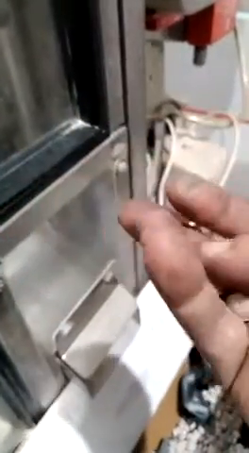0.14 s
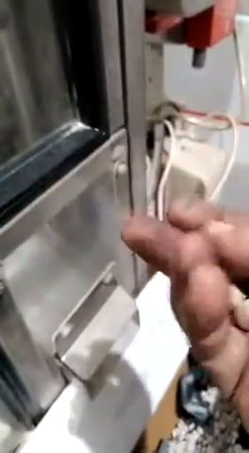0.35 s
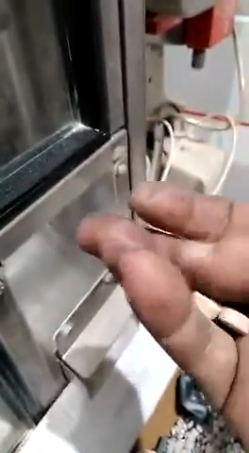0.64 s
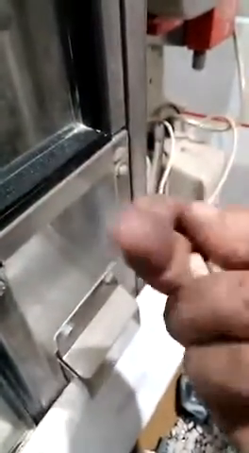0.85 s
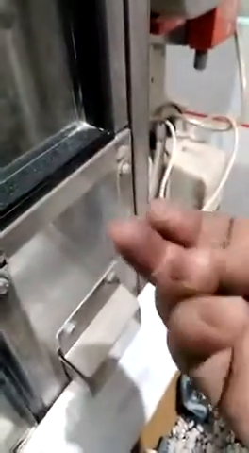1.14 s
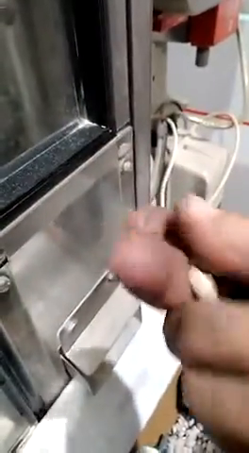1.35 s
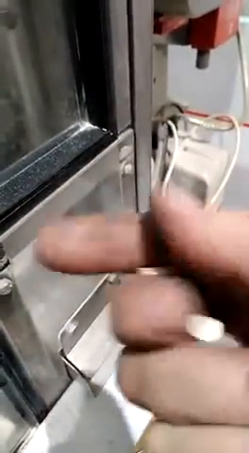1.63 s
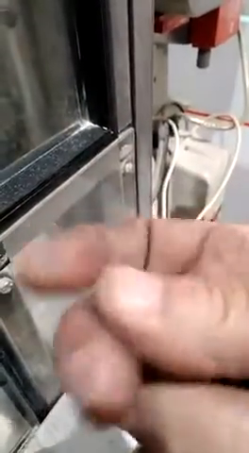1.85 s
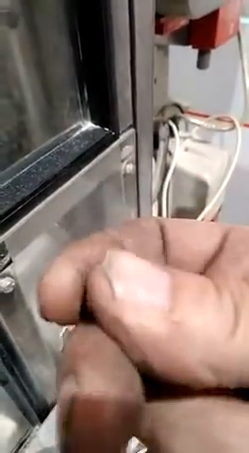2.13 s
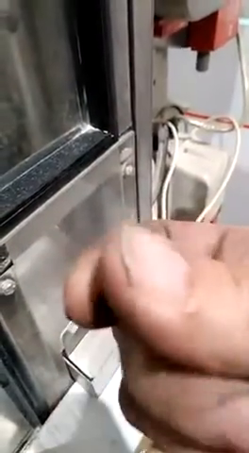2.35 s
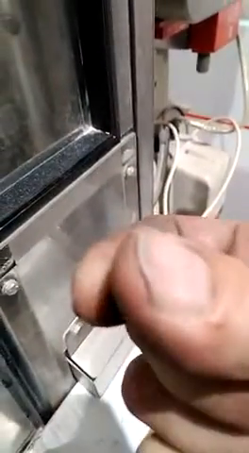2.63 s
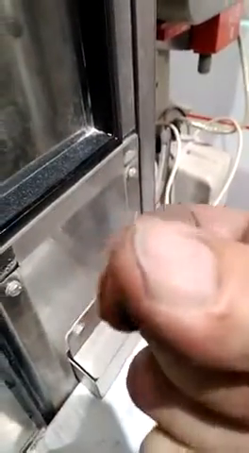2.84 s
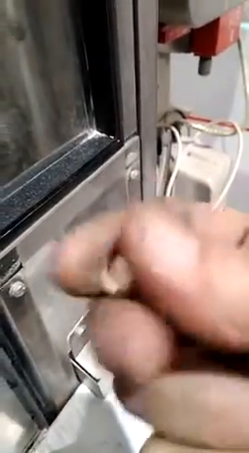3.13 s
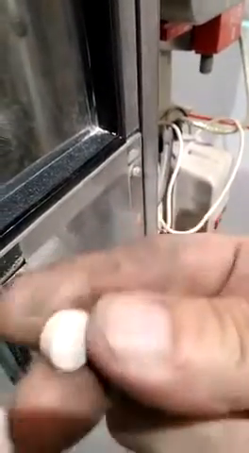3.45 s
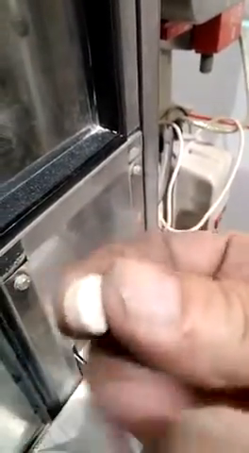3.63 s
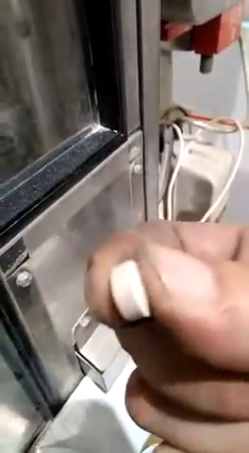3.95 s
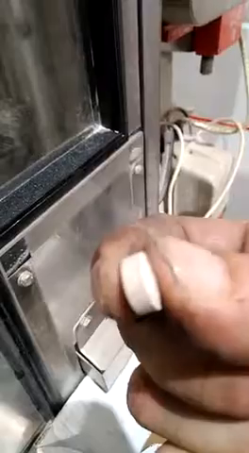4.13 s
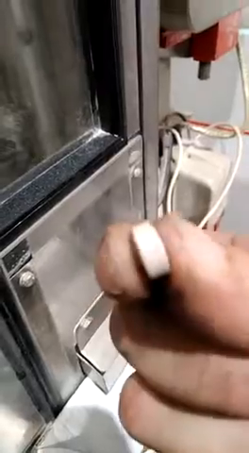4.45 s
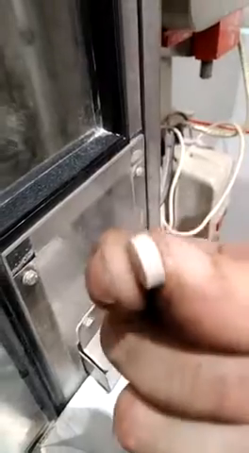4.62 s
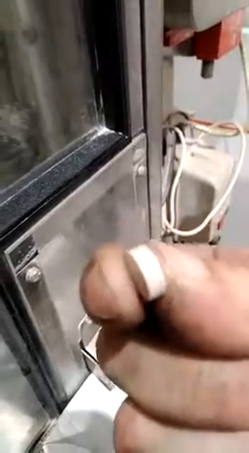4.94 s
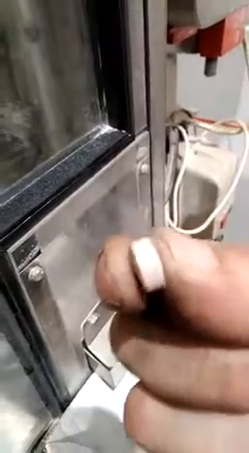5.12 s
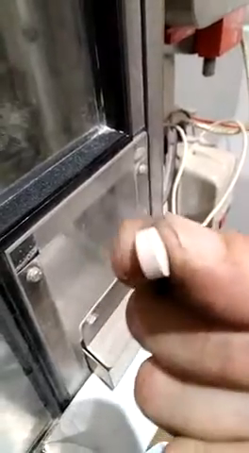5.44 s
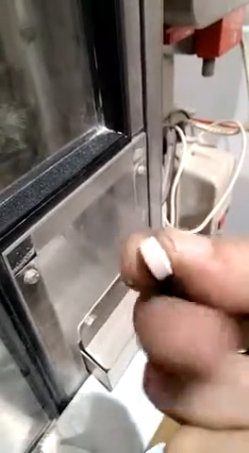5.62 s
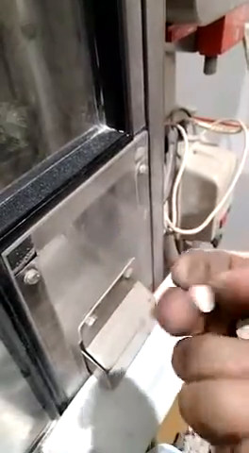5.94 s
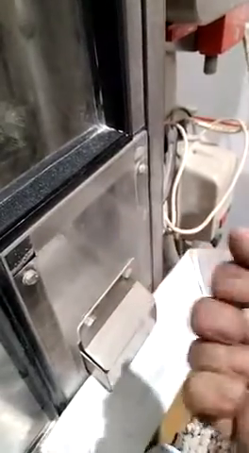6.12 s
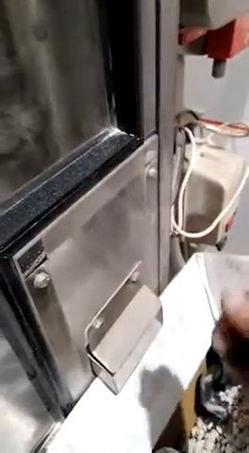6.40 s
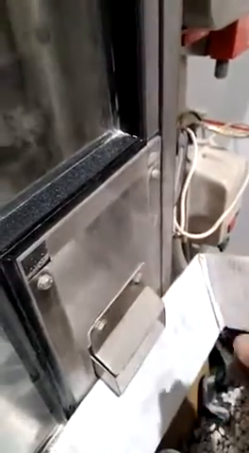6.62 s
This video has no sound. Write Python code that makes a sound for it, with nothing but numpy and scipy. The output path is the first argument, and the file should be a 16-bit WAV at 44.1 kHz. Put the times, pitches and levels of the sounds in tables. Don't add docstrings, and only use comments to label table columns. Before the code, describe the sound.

Steady cyclic clatter of a small steel machine: lighter clicks, then three heavy clanks each turn, rattling sheet metal over a low hum and sliding hiss.

```python
import sys
import numpy as np
from scipy import signal
from scipy.fft import rfft, irfft, next_fast_len
from scipy.io import wavfile
from scipy.ndimage import uniform_filter1d, minimum_filter1d, map_coordinates

SR = 44100
rng = np.random.default_rng(int(sys.argv[2]) if len(sys.argv) > 2 else 0)


def ratio_of_db(decibels):
    return 10 ** (np.asarray(decibels, float) / 20)


def master(y):
    cut = np.clip(np.atleast_2d(y).T, -1, 1)
    pcm = np.round(cut * 32767)
    wavfile.write(sys.argv[1], SR, pcm.astype(np.int16))


N = 298557
TURN = .8754


def unit(x):
    return x / np.sqrt(np.mean(x ** 2) + 1e-20)


def along(points, hz):
    f, v = np.transpose(points)
    return np.interp(np.log(hz + 1), np.log(f + 1), v)


def wobble(rate):
    knots = rng.standard_normal(int(N * rate / SR) + 4)
    return map_coordinates(knots, [np.arange(N) * rate / SR])


def filtered(x, response):
    m = next_fast_len(N + 8192)
    return irfft(rfft(x, m) * response(np.fft.rfftfreq(m, 1 / SR)), m)[..., :N]


# f/Hz, likeness (-1 opposed, 0 unrelated, 1 the same)
LIKENESS = [(60, -0.71), (99, -0.84), (160, -0.99), (270, -0.93), (450, -0.5), (740, 0.24), (1220, 0.23),
            (2010, 0.04), (3330, 0.02), (5500, -0.01), (9080, 0.0), (15000, 0.07)]
# f/Hz, level/dB
LEFT_LOUDER = [(60, 5.0), (110, 2.5), (200, 2.0), (380, 4.0), (700, 7.0), (1290, 5.0), (2380, 5.5),
               (4400, 7.0), (8120, 13.5), (15000, 1.0)]


def ports(pair, colour):
    def mix(hz):
        like = np.clip(along(LIKENESS, hz), -.995, .995)
        half_db = along(LEFT_LOUDER, hz) / 2
        to_left = ratio_of_db(half_db)
        to_right = ratio_of_db(-half_db) * like
        right_only = ratio_of_db(-half_db) * np.sqrt(1 - like ** 2)
        return ratio_of_db(along(colour, hz)) * [to_left, to_right, right_only]

    left, shared, own = filtered(pair[[0, 0, 1]], mix)
    return np.array([left, shared + own])


def rush(colour, patchy_db=0.5):
    z = signal.stft(rng.standard_normal((2, N)), nperseg=512)[2]
    field = uniform_filter1d(rng.standard_normal(z.shape[1:]), size=3, axis=0)
    field = uniform_filter1d(field, size=7, axis=1)
    noise = signal.istft(z * ratio_of_db(patchy_db * unit(field)), nperseg=512)[1][:, :N]
    return unit(ports(noise, colour))


def train(times, db):
    x = np.zeros(N)
    x[np.clip((np.asarray(times) * SR).astype(int), 0, N - 1)] = ratio_of_db(db)
    return x


def fading(x, t60, rise):
    t = np.arange(SR // 2) / SR
    return signal.fftconvolve(x, ratio_of_db(-60 * t / t60) * (1 - np.exp(-t / rise)))[:N]


def struck(impulses, modes, rise, chatter_db, chatter_t60):
    t = np.arange(SR // 3) / SR
    hz, db, t60, phase = np.transpose(modes)[:, :, None]
    decay = ratio_of_db(db - 60 * t / t60) * (1 - np.exp(-t / rise)) / np.sqrt(np.sum(ratio_of_db(db) ** 2))
    left = np.sum(decay * np.sin(2 * np.pi * hz * t), axis=0)
    right_gain = ratio_of_db(-along(LEFT_LOUDER, hz) + 0.3)
    right = np.sum(right_gain * decay * np.sin(2 * np.pi * hz * t + phase), axis=0)
    sparse = rng.random(N) < .05
    near, far = rng.standard_normal((2, N)) * sparse * 4.5
    share = np.clip(400 / hz.mean(), 0, 1)
    grit = np.array([near, share * near + np.sqrt(1 - share ** 2) * far])
    force = impulses + ratio_of_db(chatter_db) * fading(impulses, chatter_t60, 0.0014) * grit
    return signal.fftconvolve(force, [left, right], axes=1)[:, :N]


# f/Hz, t60/s
ROOM_RING = [(200, 0.32), (700, 0.63), (2000, 0.92), (6000, 0.6), (14000, 0.27)]


def room(x):
    hz, t, z = signal.stft(rng.standard_normal((2, SR // 2)), SR, nperseg=256)
    fall = ratio_of_db(-60 * t / along(ROOM_RING, hz)[:, None])
    tail = signal.istft(z * fall, SR, nperseg=256)[1]
    late = np.pad(x, (500, 0))[None]
    wet = signal.fftconvolve(late, tail / np.linalg.norm(tail[0]), axes=1)[:, :N]
    return ports(wet, [(100, 0), (16000, 0)])


# f/Hz, level/dB per Hz
RUMBLE_COLOUR = [(15, -46), (25, -2), (49, -8.5), (97, -9.5), (150, 9), (172, 7), (219, -3), (264, 5),
                 (348, -4), (500, -6.5), (650, 1), (1100, -120)]


def rumble():
    return ratio_of_db(-29.5 + 0.36 * wobble(7.3)) * rush(RUMBLE_COLOUR)


SHAFT_HZ = 25.08
# multiple of the shaft speed, left level/dB, right level/dB, right phase/rad
HUM_TONES = [(2, -21, -27.5, 3.6), (3, 0.5, -6, 2.65), (4, -21, -30, 2.66), (5, -1.5, -1.5, 3.04),
             (6, -6, -6.5, 3.06), (7, -4, -3.5, 3.02), (8, -12.5, -8.5, 2.4)]
# t/s, level/dB
HUM_LOUDNESS = [(0.0, -57), (0.19, -43), (0.56, -54), (0.79, -45.5), (2.09, -41.5), (2.15, -46), (3.0, -42.5),
                (3.04, -47), (4.24, -42.5), (4.35, -47), (4.58, -39), (5.09, -48.5), (5.37, -42), (5.94, -50),
                (6.03, -43), (6.26, -44.5), (6.37, -47.5), (6.77, -39)]


def motor():
    level_db = np.interp(np.arange(N) / SR, *np.transpose(HUM_LOUDNESS))
    angle = 2 * np.pi * np.cumsum(SHAFT_HZ * (1 + 0.0025 * wobble(1.35))) / SR
    hum = np.zeros((2, N))
    for k, left_db, right_db, phase in HUM_TONES:
        start = rng.uniform(0, 2 * np.pi)
        sway_db = 3.8 * wobble(4.49) * (.3 if k == 3 else 1)
        level = ratio_of_db(sway_db + np.array([[left_db], [right_db]]))
        hum += level * np.sin(k * angle + start + np.array([[0], [phase]]))
    return ratio_of_db(level_db + 11.0) * hum


# f/Hz, level/dB per Hz
GEAR_COLOUR = [(180, -42), (300, -7), (376, 0), (494, -3.5), (634, 0.5), (880, -1), (1090, -10.5),
               (1280, -6.5), (1550, -13.5), (2080, -15), (2520, -16.5), (3060, -24.5), (3550, -21),
               (4500, -33.5), (5850, -28), (9900, -120)]


def gears():
    mesh_db = .9 * wobble(3) + 1.2 * wobble(30)
    return ratio_of_db(-31.0 + mesh_db) * rush(GEAR_COLOUR, patchy_db=1.5)


# f/Hz, level/dB per Hz
SLIDE_COLOUR = [(1470, -7), (2500, -40), (2940, -26), (3980, -5.5), (7890, -6), (9890, -12.5), (12400, -14),
                (15400, -6.5), (16000, -28)]
# t/s into the turn, level/dB
SHOE_STROKE = [(0, -47.5), (.15, -50), (.35, -46.5), (.45, -51.5), (.56, -43), (.68, -50.5), (.76, -48),
               (.84, -55.5)]
# t/s, level/dB over usual
SHOE_KNOCKS = [(.1291, 4), (.1468, -10), (.2545, -3.5), (1.0067, -3), (1.0183, 1.5), (1.1287, -3),
               (1.8774, 4.5), (1.8974, 4), (2.0059, -1.5), (2.7571, 2.5), (2.7733, 3), (2.8787, -4),
               (3.6343, 1), (3.6462, 1.5), (3.7528, -3.5), (4.5059, 4.5), (4.5273, 7), (4.6295, -3),
               (5.3795, 4), (5.3989, 4.5), (5.501, -2.5), (6.2596, -4.5), (6.2703, -1.5), (6.3822, -2.5)]


def feed_shoe():
    t = np.arange(N) / SR
    load_s, level_db = np.reshape(SHOE_KNOCKS, (-1, 3, 2)).mean(axis=1).T
    slide_db = np.interp(t, *np.transpose(SHOE_STROKE), period=TURN)
    slide_db = slide_db + 0.17 * np.interp(t, load_s, level_db)
    return ratio_of_db(slide_db + 1.4 * wobble(60) + 3.5) * rush(SLIDE_COLOUR, patchy_db=1.5)


# t/s, peak level/dB
TABLET_LANDINGS = [(0.059, -31.5), (0.3586, -26), (0.8789, -30), (0.9243, -26), (1.4012, -17.5),
                   (1.7704, -30), (1.8108, -28.5), (1.8522, -36), (1.9194, -31.5), (1.958, -30.5),
                   (2.0694, -33), (2.7003, -30), (2.834, -53), (2.9447, -30), (2.9871, -30), (3.0485, -52),
                   (3.4999, -30.5), (3.5478, -29.5), (3.6711, -37), (3.713, -32), (4.2492, -41),
                   (4.4344, -27), (4.5186, -28.5), (4.6994, -35), (5.2894, -33), (5.446, -43),
                   (5.6094, -28), (5.673, -47), (5.7663, -34), (6.1374, -32), (6.1764, -36), (6.344, -28.5)]
# f/Hz, level/dB per Hz
CHUTE_COLOUR = [(3500, -22), (5000, -3.5), (5450, -19), (5600, 6), (5750, -10), (7800, -3), (9500, -12),
                (11500, -13), (14000, -40)]


def tablets():
    s, db = np.transpose(TABLET_LANDINGS)
    return fading(train(s, db - 9.0), t60=0.33, rise=0.00091) * rush(CHUTE_COLOUR, patchy_db=1.0)


# t/s, peak level/dB
EJECTOR_TICKS = [
    (0.0211, -27.5),
    (0.8977, -22.5),
    (1.7704, -31),
    (2.6469, -26.5),
    (3.5184, -41),
    (4.4016, -21.5),
    (5.2739, -23.5),
    (6.1459, -69),
]
# t/s, peak level/dB
FOLLOWER_TICKS = [(.4383, -22), (1.315, -32), (2.191, -25), (3.064, -24), (3.944, -27), (4.8186, -28),
                  (5.69, -22), (6.568, -30)]
# f/Hz, level/dB per Hz
TICK_COLOUR = [(500, -40), (1500, -7), (4000, 5), (7500, 11.5), (12000, 5.5), (16000, 3)]


def ejector():
    s, db = np.transpose(EJECTOR_TICKS + FOLLOWER_TICKS)
    return fading(train(s, db - 0.4), t60=0.019, rise=0.00027) * ratio_of_db([[-1.5], [3]]) * rush(TICK_COLOUR)


# t/s, peak level/dB
PUNCH_BOUNCES = [(0.3318, -28), (0.4873, -21), (0.5736, -9), (0.6088, -8), (0.6603, -10), (0.6717, -18),
                 (1.2051, -14), (1.3643, -9), (1.4023, -23), (1.4167, -22), (1.4409, -8), (1.4538, -2),
                 (1.5326, 0.5), (1.5442, -2), (1.9114, -8.5), (2.0821, -22), (2.2401, -13), (2.2747, -14),
                 (2.3239, -18), (2.3303, -12), (2.3466, -15), (2.3673, -9), (2.4119, -4.5), (2.4255, -19),
                 (2.9573, -15), (3.1133, -12), (3.15, -19), (3.1997, -3), (3.258, -7), (3.2834, -17),
                 (3.2911, -5), (3.3081, -27), (3.8308, -14.5), (3.9607, -21), (3.9959, -1), (4.0671, -6),
                 (4.0793, -1.5), (4.1136, -18), (4.1682, -7), (4.8735, -4), (4.9582, -3), (5.0352, -6),
                 (5.0491, -25), (5.0636, -11), (5.4126, -17), (5.5835, -10), (5.7389, -12), (5.8311, -2),
                 (5.9079, -4), (5.9167, -4), (6.4581, -16), (6.6155, -4), (6.6243, -1), (6.6561, -4),
                 (6.7017, -6), (6.7123, -10), (6.7245, -6), (6.7389, -10.5)]
# f/Hz, level/dB, t60/s, right phase/rad
PANEL_MODES = [(600, -8, 0.056, 2.6), (647, 1, 0.062, 0.3), (693, 0, 0.054, 1.5), (780, 1, 0.02, -0.5),
               (880, -5, 0.026, 3)]
# f/Hz, level/dB, t60/s, right phase/rad
FRAME_MODES = [(1650, -1, 0.091, -1.2), (1753, -0.5, 0.058, .5), (1804, -4.5, 0.075, -0.25),
               (1838, 3, 0.056, 2.2)]
UPPER_FRAME_MODES = [(2205, 9, 0.046, -3.4), (2298, 6.5, 0.029, 1.5), (2390, 2.5, 0.07, -3),
                     (2513, 2.5, 0.067, 4), (2590, -7, 0.068, 1), (2864, -12.5, 0.044, -1.5),
                     (2906, -8, 0.037, 0.5)]


def bounces():
    s, db = np.transpose(PUNCH_BOUNCES)
    panel = struck(train(s, db - 0.5), PANEL_MODES, rise=0.0011, chatter_db=-29, chatter_t60=0.036)
    clink_modes = FRAME_MODES + UPPER_FRAME_MODES
    clink = struck(train(s, db - 17.0), clink_modes, rise=0.0003, chatter_db=-21, chatter_t60=0.03)
    return panel + clink


# t/s into the turn, then level/dB of cabinet, plate, frame, rattle
CAM_STATIONS = [(.021, -29.5, -59, -63, -42.5), (.129, -22.5, -39, -40, -71),
                (.146, -18.5, -44.5, -42.5, -46.5), (.253, -15, -23, -42, -26.5),
                (.320, -17.5, -24, -30.5, -40.5), (.421, -54, -37, -53, -59),
                (.439, -27.5, -32, -40.5, -19.5), (.4745, -8.5, -21.5, -27, -33),
                (.5175, -11, -21.5, -18.5, -29), (.5588, -5, -17.5, -32, -31.5),
                (.602, -21.5, -25.5, -28.5, -45), (.6463, -10.5, -19.5, -23, -27),
                (.665, -19.5, -41, -53.5, -46), (.870, -49, -53, -67, -65)]
# t/s, level/dB over usual
FOLLOWER_KNOCKS = [(.3176, 4.5), (.4383, 0), (1.195, 2.5), (1.3152, -4), (2.0713, 2.5), (2.1906, -1.5),
                   (2.9485, 3.5), (3.0632, -1), (3.8224, 1.5), (3.944, -4), (4.6985, 1.5), (4.8164, -5),
                   (5.5767, 3.5), (5.6895, -0.5), (6.448, 3), (6.568, -5.5)]
# t/s, level/dB over usual
HEAVY_BLOWS = [(0.4739, 0.5), (.5587, 4.5), (.6468, -0.5), (1.3509, 2.5), (1.4346, 1), (1.5213, -2.5),
               (2.2243, 3.5), (2.3082, 5), (2.3963, -2.5), (3.1011, 2.5), (3.1853, 4.5), (3.2716, -0.5),
               (3.9776, 2), (4.0609, 5.5), (4.1487, -4), (4.8517, 2), (4.9351, 1.5), (5.0248, -2.5),
               (5.7255, 2), (5.8122, 2), (5.8989, 0), (6.6027, 2.5), (6.6865, 1.5)]
# t/s, level/dB over usual
LIGHT_KNOCKS = [(.517, -2.5), (.602, 8), (.663, -15), (1.392, 1.5), (1.477, 7.5), (1.543, 9), (2.267, -1),
                (2.352, 5), (2.411, 4), (3.143, -2.5), (3.228, 5), (3.290, 6), (4.020, 0), (4.104, 5.5),
                (4.160, 14.5), (4.893, -2), (4.980, 10), (5.037, 13), (5.768, 1), (5.854, 6.5), (5.916, 1),
                (6.645, -1.5), (6.729, 3)]
# t/s, level/dB over usual
FOLLOWER_SLIPS = [
    (1.334, -6),
    (3.960, -3.5),
    (4.846, -26),
    (6.586, -4),
]


def contacts():
    place = np.transpose(CAM_STATIONS)[0]
    s = (np.arange(8)[:, None] * TURN + place).ravel()
    station = np.tile(np.arange(len(place)), reps=8)
    s = s + .0007 * rng.standard_normal(len(s))
    over_db = np.zeros(len(s))
    ticks = [(tick, 0) for tick, _ in EJECTOR_TICKS]
    strays = SHOE_KNOCKS + FOLLOWER_KNOCKS + HEAVY_BLOWS + LIGHT_KNOCKS + ticks
    stray_s, stray_db = np.transpose(strays)
    nearest = np.argmin(np.abs(stray_s[:, None] - s), axis=1)
    s[nearest], over_db[nearest] = stray_s, stray_db
    slip_s, slip_db = np.transpose(FOLLOWER_SLIPS)
    s, over_db = np.append(s, slip_s), np.append(over_db, slip_db)
    station = np.append(station, np.full(len(slip_s), fill_value=7))
    inside = s < N / SR
    return s[inside], station[inside], over_db[inside]


# level/dB of base, door, upper frame against the blow, rebound t/s, rebound loss/dB
STATION_SHARES = [(-22, 4, -13.5, 0.018, 15), (6, -5.5, -25, 0.0084, 2.1), (2, -2, -20, 0.049, 0.54),
                  (1.5, -2.5, 0.5, 0.024, 87), (-1.5, -0.5, -12.5, 0.015, 0.47), (-14, -9, 14, 0.0043, 15),
                  (9, 4.5, 16.5, 0.0095, 4.9), (-5, -1, 0, 0.00631, 2.8), (-20, -2.5, -12, 0.012, 6.3),
                  (-10.5, -3.5, 2.5, 0.0185, 4.9), (-3.5, 0.5, -20, 0.013, 4.2), (-6, 7, 8, 0.0055, 2.8),
                  (-13, -23, 0, 0.0076, 14), (17.5, -5, -11, 0.0092, 9.1)]
# level/dB of die and punch guides against the frame, level/dB of the crack
PUNCH_SHARES = [(-6, -14, -60), (-6, -22, -50), (6, -23, -54), (-2, 4, -31), (-1, -7.5, -30),
                (-9, 14.5, -65), (13, 21.5, -36), (4.5, -6.5, -28), (2, -11, -30), (3, -1.5, -32),
                (-5, -46, -39.5), (8, -4, -29.5), (-7, 2, -58), (-6, -11, -60)]
# f/Hz, level/dB, t60/s, right phase/rad
BASE_MODES = [(260, -6.5, 0.19, 3.01), (283, -6.5, 0.13, 3.43), (348.2, 1.5, 0.16, 3.33),
              (389.6, -3, 0.17, 2.97), (453.3, 3.5, 0.053, 2.7)]
CABINET_MODES = [(555.8, -9, 0.2, 4.37), (624, -17.5, 0.063, 3.2), (626, 0.5, 0.11, 3.2),
                 (644.8, 4.5, 0.082, 0.091), (660.6, 0, 0.061, 0.23), (693.6, 5.5, 0.079, 0.87)]
DOOR_MODES = [(735, 1, 0.09, 4.5), (765, 3, 0.08, 1.45), (790, 1.5, 0.08, -1.4), (825, -3, 0.08, -0.1),
              (849, -1, 0.09, 1), (873, -3, 0.08, 3.8), (940, -7, .05, 2), (1012, -6, 0.05, 1.93)]
PLATE_MODES = [(1227, -25, 0.049, 2.7), (1244, -10.5, 0.054, 1.6), (1272.5, -8.5, 0.14, 0.66),
               (1293.7, -5, 0.22, 0.69), (1367, -4, 0.055, 0.39), (1480, -34, .04, 0.77),
               (1660, -20, 0.036, -0.46)]
DIE_MODES = [(1947, 1.5, 0.083, -2.7), (2040, 1, 0.11, 2), (2107, -3, 0.086, -0.3), (2240, -3, 0.049, 0),
             (2335, -2.5, 0.052, -5)]
GUIDE_MODES = [(3230, -13.5, 0.016, -12.5), (3170, -5.5, 0.049, 8), (3435, 1.5, 0.071, 0.3),
               (3558, 1, 0.049, 9.5), (3700, 2, 0.047, -1.4), (4100, -6, .03, 2.5), (4330, -8.5, .03, 3)]
# f/Hz, level/dB per Hz
CRACK_COLOUR = [(800, -30), (1800, 12), (3000, 5), (5000, 0), (9000, -9), (14000, -24)]
RATTLE_COLOUR = [(500, -4.5), (1760, 2.5), (3000, -2), (4380, -5.5), (4860, -8.5), (6260, -11.5),
                 (6760, -8.5), (7890, -13.5), (9530, -14), (12300, -27), (14500, -33), (15300, -22),
                 (16000, -40)]


def cam():
    s, station, over_db = contacts()
    scatter_db = 1.1 * rng.standard_normal((len(s), 4))
    levels = np.array(CAM_STATIONS)[station, 1:] + over_db[:, None] + scatter_db
    cabinet_db, plate_db, frame_db, rattle_db = levels.T
    base_db, door_db, upper_db, after, loss_db = np.array(STATION_SHARES)[station].T
    die_db, guide_db, crack_db = np.array(PUNCH_SHARES)[station].T
    crack = fading(train(s, crack_db + over_db + 2.5), t60=0.01, rise=0.00016) * rush(CRACK_COLOUR)

    def with_rebound(db, extra_db):
        return np.append(db, db - loss_db - extra_db)

    s = np.append(s + 0.00055, s + after)
    cabinet_db = with_rebound(cabinet_db + 1.5, 6.2)
    plate_db = with_rebound(plate_db, 0.45)
    frame_db = with_rebound(frame_db + 1.5, 2.3)
    rattle_db = with_rebound(rattle_db - 4.0, 10.2)
    shares = (base_db, door_db, upper_db, die_db, guide_db)
    base_db, door_db, upper_db, die_db, guide_db = (np.tile(share, 2) for share in shares)

    def ring(db, modes, rise, chatter_db, chatter_t60):
        return struck(train(s, db), modes, rise, chatter_db, chatter_t60)

    steel = ring(cabinet_db + base_db - 1.5, BASE_MODES, 0.0038, -26.5, 0.18)
    steel += ring(cabinet_db + 2.0, CABINET_MODES, 0.0027, -26.0, 0.061)
    steel += ring(cabinet_db + door_db, DOOR_MODES, 0.0029, -19, 0.037)
    steel += ratio_of_db([[0], [-2.5]]) * ring(plate_db - 5.5, PLATE_MODES, 0.00093, -23.5, 0.17)
    steel += ring(frame_db - 0.5, FRAME_MODES, 0.00038, -24.5, 0.072)
    steel += ring(frame_db - 0.7 + upper_db, UPPER_FRAME_MODES, 0.0009, -21, 0.093)
    steel += ring(frame_db + die_db, DIE_MODES, 0.0038, -24, 0.042)
    steel += ring(frame_db + guide_db, GUIDE_MODES, 0.00071, -24.0, 0.1)
    loose = ratio_of_db(1.3 * wobble(150)) * rush(RATTLE_COLOUR, patchy_db=3.0)
    rattle = fading(train(s, rattle_db + 5.5), t60=0.2, rise=0.0017) * loose
    return steel + crack + rattle


def scene():
    background = rumble() + motor() + gears() + feed_shoe()
    blows = cam() + bounces()
    echo = ratio_of_db(-14.5) * room(blows[0])
    return background + echo + tablets() + ejector() + blows


def limited(x, top, hold, smooth):
    need = np.minimum(1, top / (np.abs(x).max(axis=0) + 1e-9))
    held = minimum_filter1d(need, int(hold * SR))
    return x * uniform_filter1d(held, int(smooth * SR))


# f/Hz, level/dB
MICROPHONE_RESPONSE = [(15, -25), (30, -19), (46, 1.5), (14600, 1), (16400, -2), (16520, -80)]


def microphone(x):
    return filtered(x, lambda hz: ratio_of_db(along(MICROPHONE_RESPONSE, hz)))


def band_limit(x):
    return signal.sosfilt(signal.butter(12, 16500, fs=SR, output="sos"), x)


def record(dry):
    ducked = limited(microphone(dry), top=1.1, hold=0.011, smooth=0.0043)
    clipped = ducked / (1 + np.abs(ducked / 1.04) ** 12) ** (1 / 12)
    return band_limit(clipped)


dry = scene()
out = record(dry)
master(out)
```